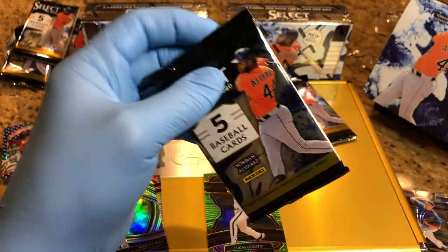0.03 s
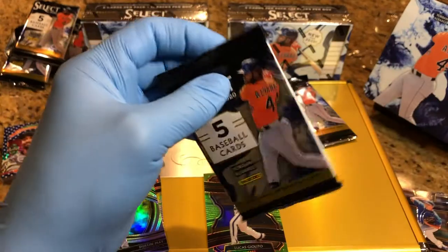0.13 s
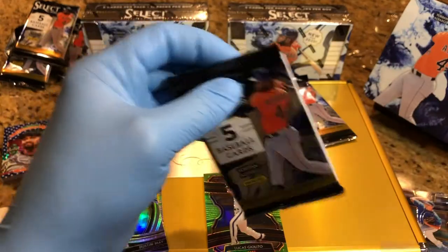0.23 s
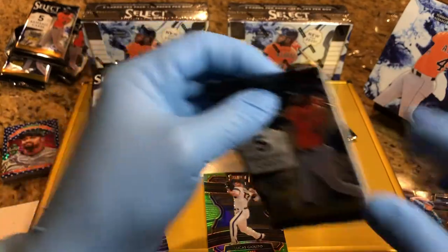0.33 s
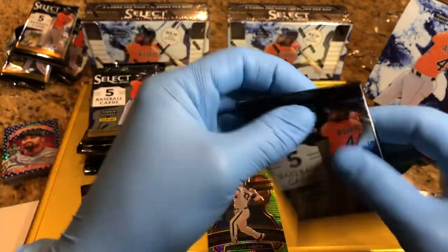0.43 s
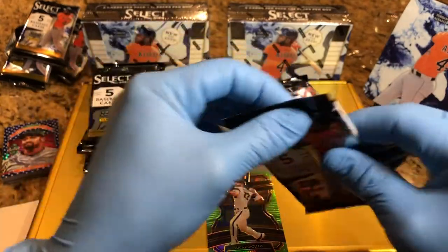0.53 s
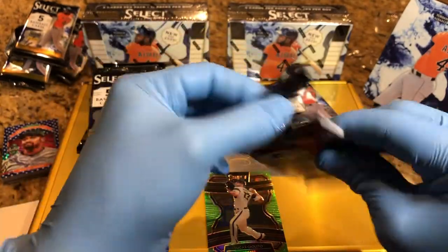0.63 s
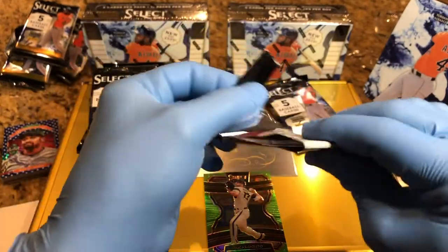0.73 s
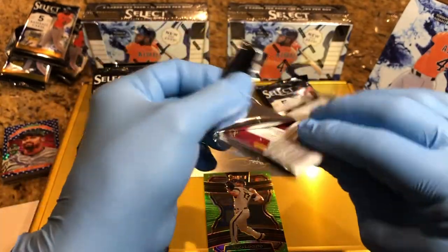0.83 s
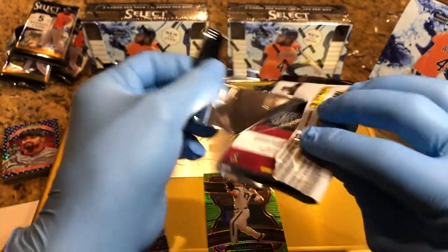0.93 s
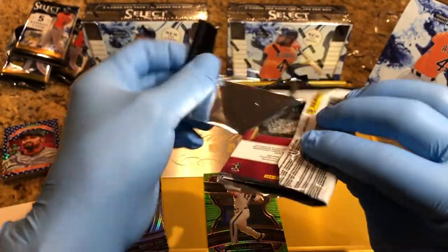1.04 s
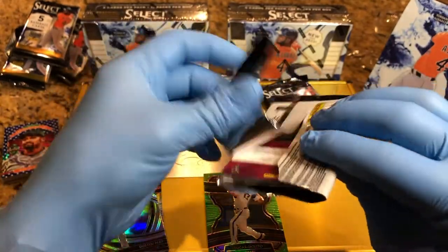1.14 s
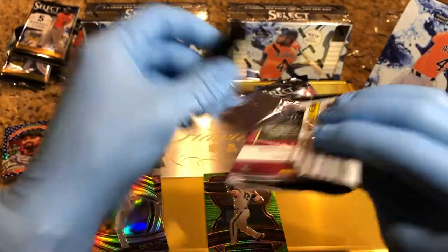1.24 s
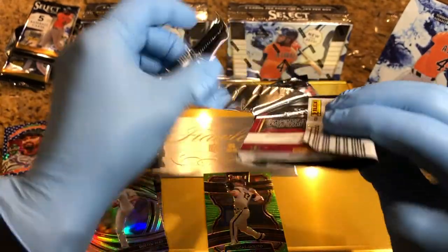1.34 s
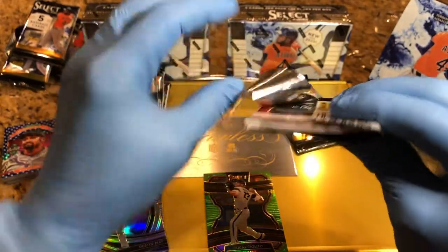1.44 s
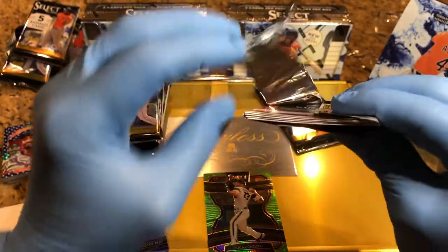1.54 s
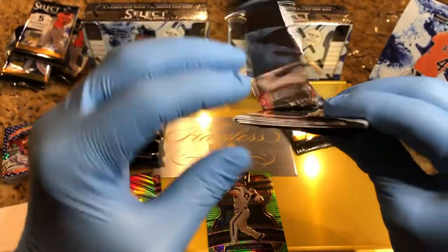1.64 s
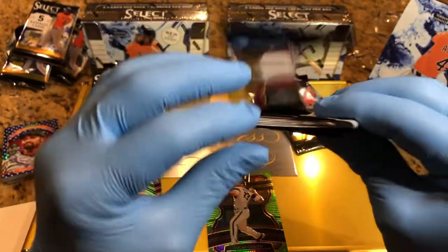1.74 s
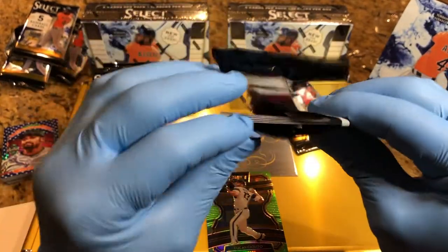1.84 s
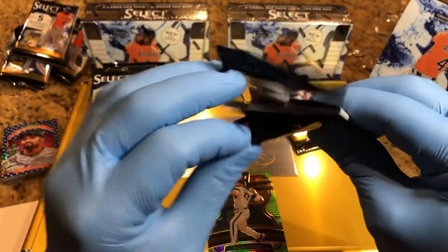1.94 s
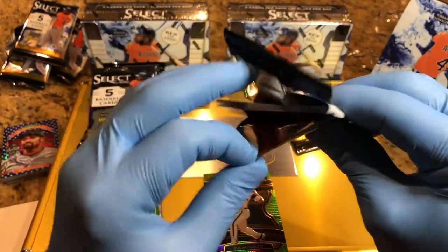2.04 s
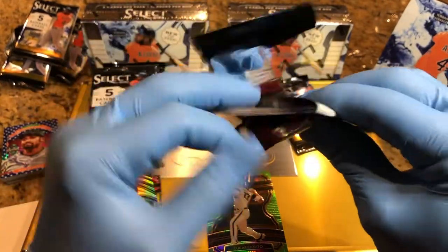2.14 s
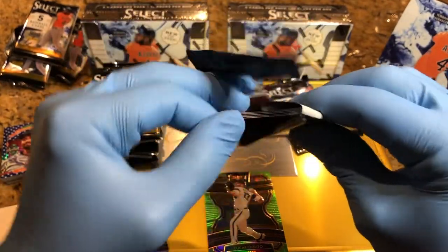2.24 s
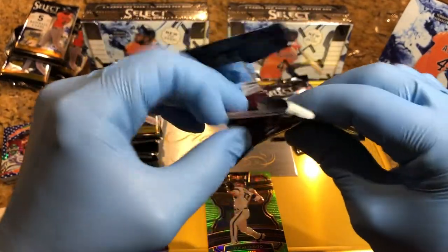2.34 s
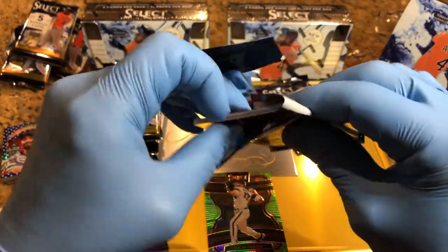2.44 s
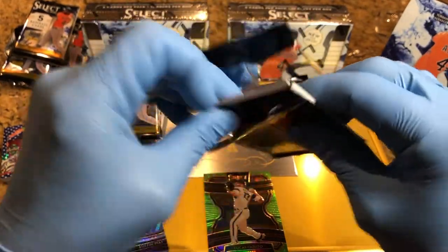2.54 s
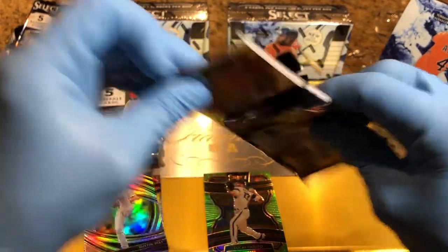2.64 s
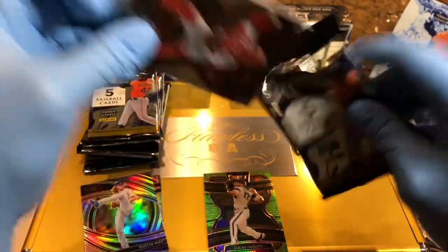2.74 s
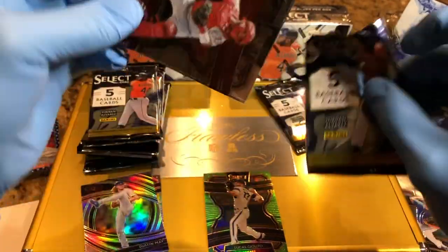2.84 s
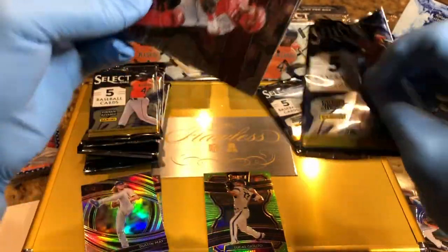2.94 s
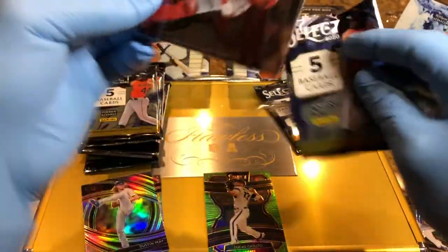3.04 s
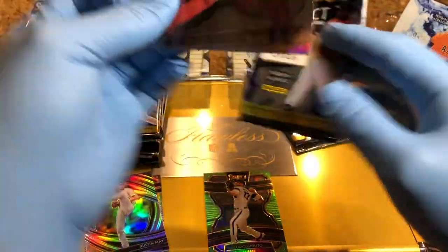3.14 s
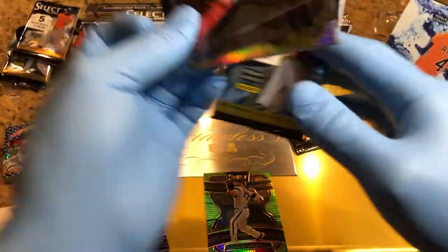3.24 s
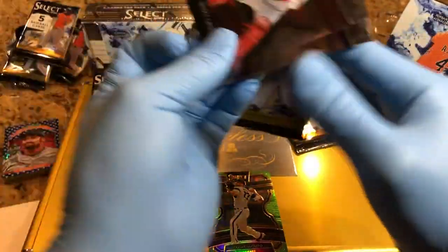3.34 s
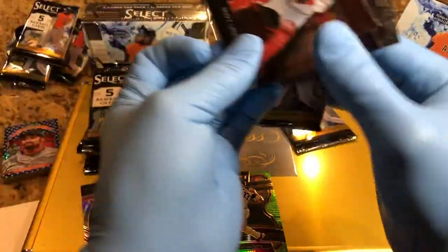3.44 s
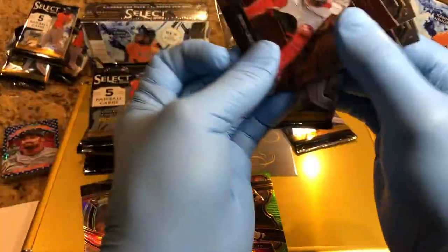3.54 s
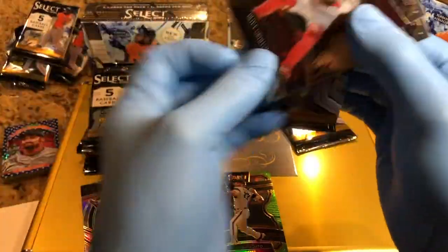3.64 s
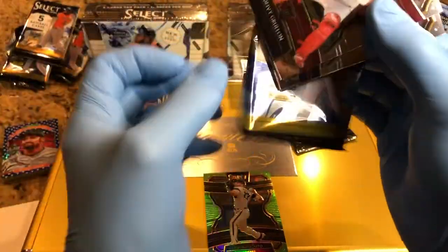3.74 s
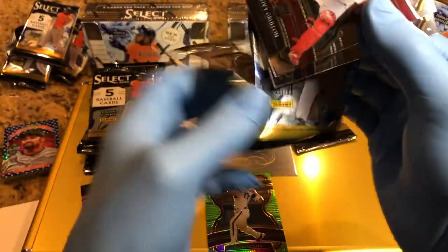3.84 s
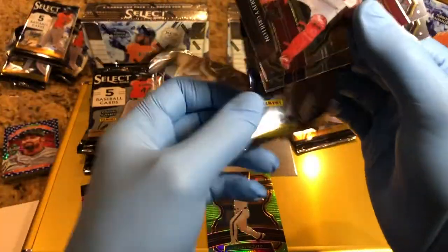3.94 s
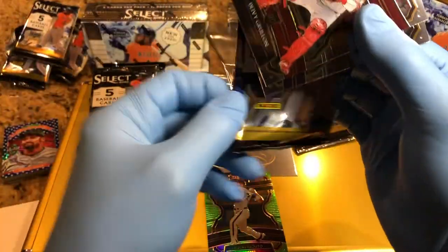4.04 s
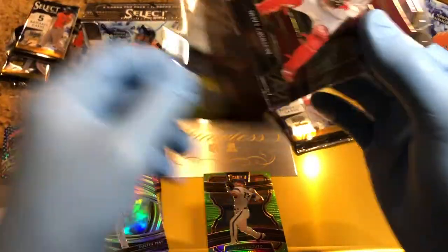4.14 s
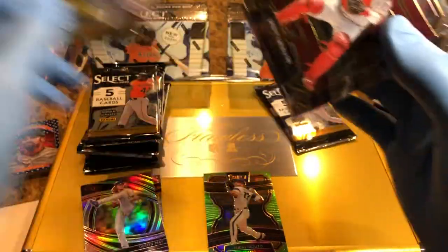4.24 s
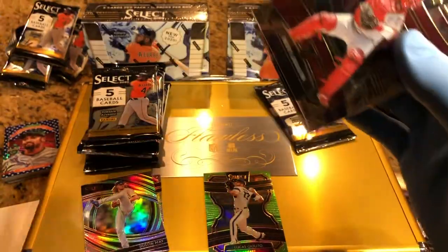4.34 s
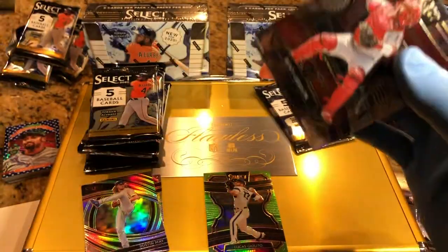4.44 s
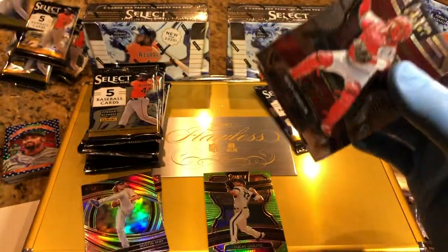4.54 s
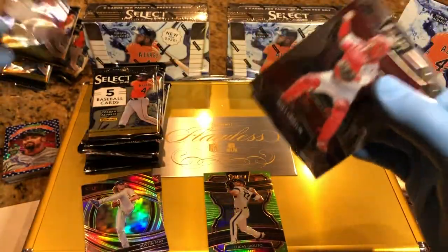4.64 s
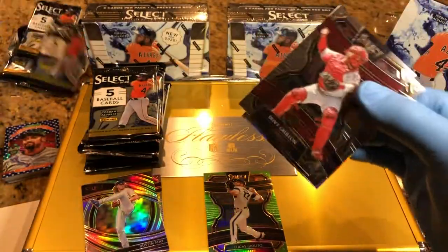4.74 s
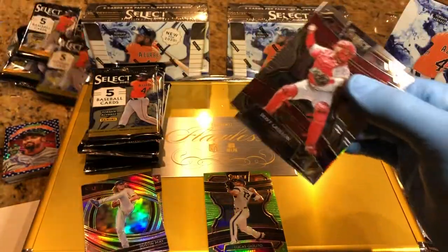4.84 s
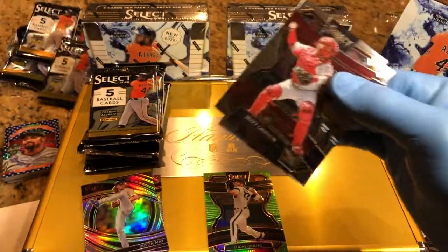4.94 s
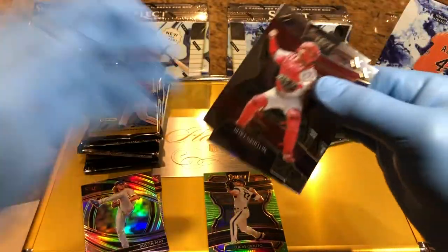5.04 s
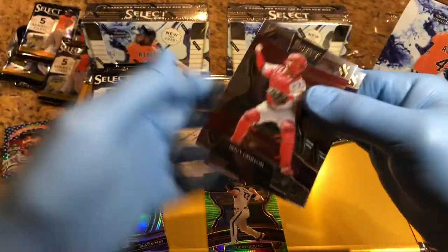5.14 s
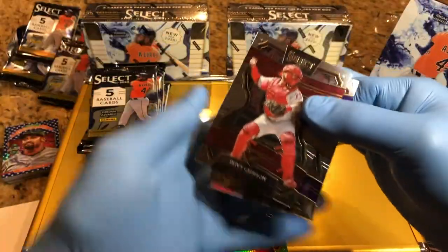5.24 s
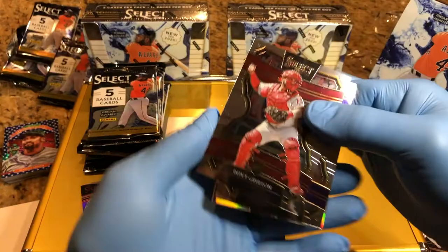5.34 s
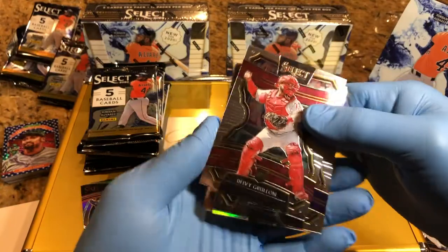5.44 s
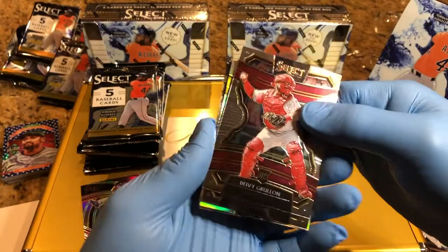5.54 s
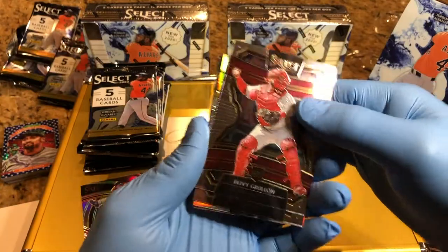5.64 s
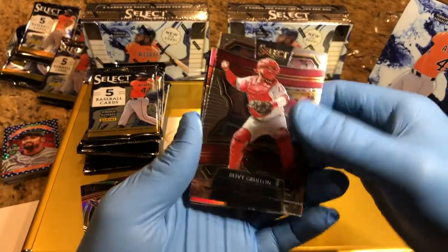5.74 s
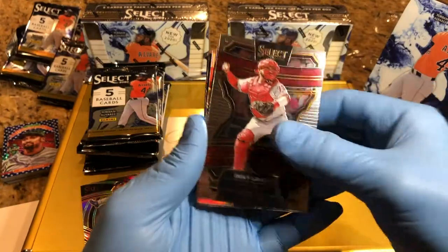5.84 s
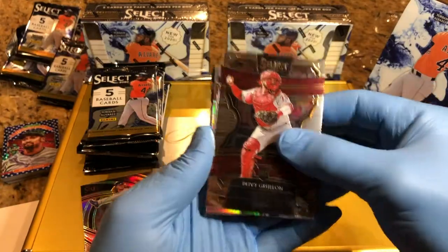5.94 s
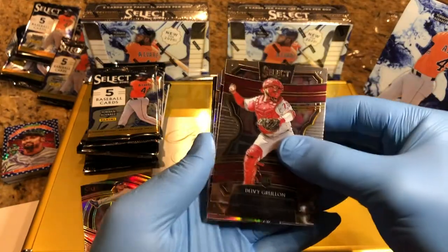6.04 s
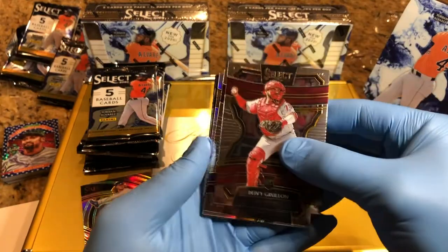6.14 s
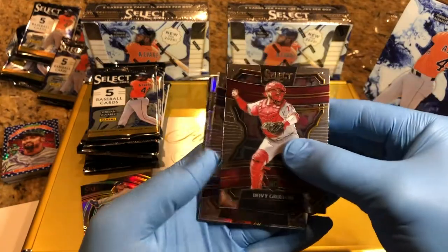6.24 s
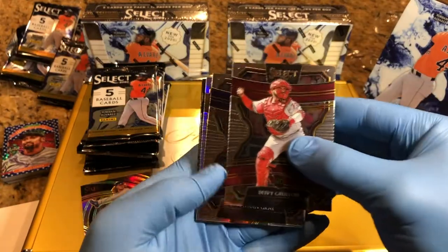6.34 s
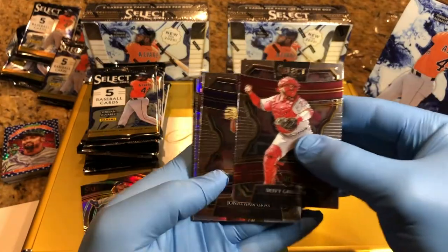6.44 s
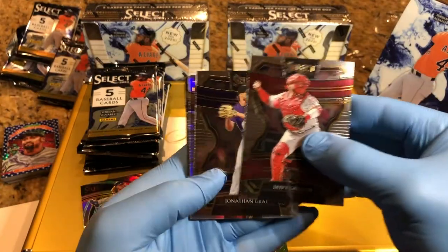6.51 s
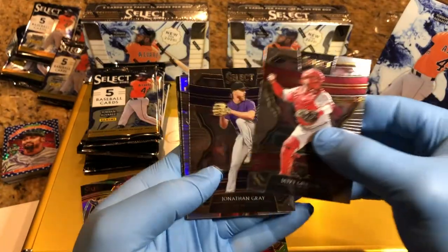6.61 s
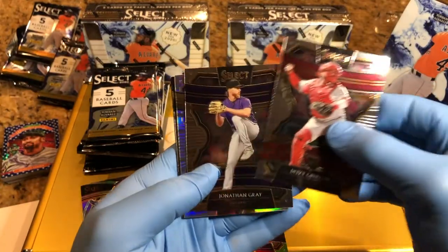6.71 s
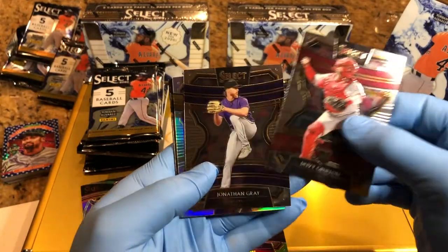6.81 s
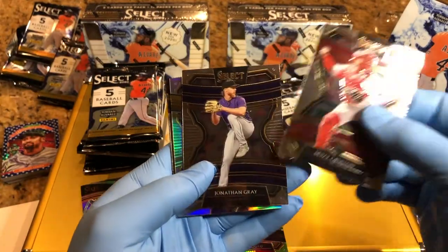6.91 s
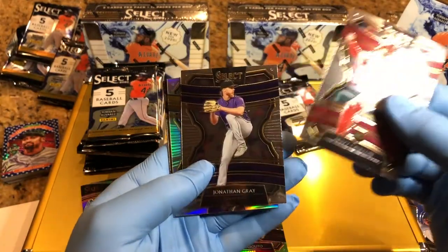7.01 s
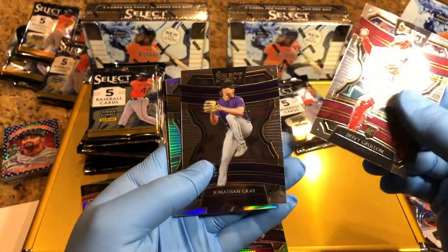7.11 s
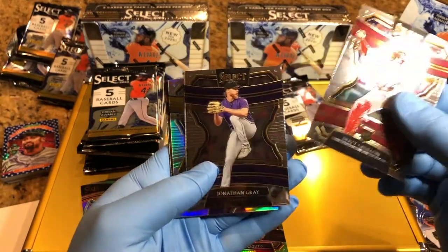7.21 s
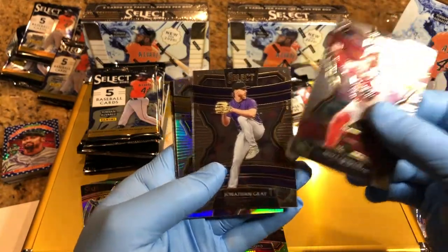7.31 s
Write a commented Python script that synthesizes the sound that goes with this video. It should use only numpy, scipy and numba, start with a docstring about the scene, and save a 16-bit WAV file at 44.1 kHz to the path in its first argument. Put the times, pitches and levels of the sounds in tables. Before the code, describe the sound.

A thin foil wrapper is handled loudly at first, with dense rustle, crisp snaps and a soft knock. Two short creaking peels follow, then a lull and renewed crinkling with several muffled table bumps around the middle. Afterwards only light friction and small clicks of cards remain. Indoor, close, slightly reflective, with low room drone beneath.

```python
"""Gloved hands tear open a foil pack of cards close to a phone, while a small room hums behind throughout.
At first the foil rustles and snaps thickly; small knocks on the table come in between.
The seam creaks twice as it peels, near 0.9 s and 1.3 s. The wrapper is then crumpled in uneven bursts, loud
again near 2.3 and 4 s, softer after; from about 5 s the cards are fanned with faint slides.
Rustle, snaps and slides are shaped noise; the creaks are rows of clicks that ring the flap, and the knocks are
noise pushed into a low resonance."""
import sys
import numpy as np
from scipy import signal
from scipy.fft import rfft, irfft
from scipy.io import wavfile
from scipy.ndimage import uniform_filter1d
from numba import njit

SR = 44100
rng = np.random.default_rng(int(sys.argv[2]) if len(sys.argv) > 2 else 0)


def digitize_waveform(pressure):
    """Quantize a signal to 16-bit integers and store it at the path in sys.argv[1].

    Rows of a 2-D input are taken as channels; values are limited to [-1, 1].
    """
    field = np.atleast_2d(pressure).T
    bounded = np.clip(field, -1, 1)
    quanta = np.round(bounded * 32767).astype(np.int16)
    wavfile.write(sys.argv[1], SR, quanta)


N = 325012  # samples in the scene, about 7.4 s


def undb(db):
    """Turn decibels into a plain amplitude factor."""
    return 10 ** (np.asarray(db) / 20)


def level(x, db):
    """Scale a sound so that its average (RMS) level is db."""
    return x * undb(db) / np.sqrt(np.mean(x ** 2))


@njit
def svf(x, hz, width):
    """State-variable band-pass with a moving centre, gain 1 there."""
    y = np.empty(len(x))
    band_state, low_state = 0., 0.
    for i in range(len(x)):
        g = np.tan(np.pi * hz[i] / SR)
        damping = width[i] / hz[i]
        v = (band_state + g * (x[i] - low_state)) / (1 + g * (g + damping))
        band_state = 2 * v - band_state
        low_state += 2 * g * v
        y[i] = damping * v
    return y


def band(x, hz, width):
    """Band-pass with fixed or moving centre and width in Hz."""
    one = np.ones(len(x))
    return svf(x, hz * one, width * one)


def band_twice(x, hz, width):
    """The same band-pass twice in a row, for steeper sides."""
    return band(band(x, hz, width), hz, width)


def curve(table):
    """Draw straight lines between the rows of a table: one value per sample for each column after time."""
    s, *columns = np.transpose(table)
    return [np.interp(np.arange(N) / SR, s, c) for c in columns]


def walk(rate):
    """Random levels, a new one every 1 / rate seconds, joined by slopes; spread near 1."""
    k = int(SR / rate)
    steps = np.repeat(rng.standard_normal(N // k + 1), k)
    return uniform_filter1d(steps, k)[:N]


def parts(crackle, mid_hz):
    """Filter three rows of crackle into a low, a middle and a high part."""
    low = band_twice(crackle[0], 1250, 2400)
    mid = band_twice(crackle[1], mid_hz, 1.7 * mid_hz)
    high = band_twice(crackle[2], 10500, 26000)
    return low, mid, high


def air():
    """Steady room noise, with ventilation droning in a few low room modes and faint, almost pure tones."""
    # noise colour of the room: (frequency [Hz], relative level per Hz [dB])
    air_colour = [(15, -53.5), (25, -16.5), (48, -8), (153, -6), (236, -2.5), (270, -4.5), (301, -0.5),
                  (335, -5), (373, -3.5), (516, -14), (560, -13), (1230, -22), (1560, -30.5), (3430, -34.5),
                  (16000, -50.5)]
    # ventilation drones in room modes: (frequency [Hz], width [Hz], level [dB])
    drones = [(59.6, 6.4, -76), (181.3, 25, -78.5), (299, 41, -70.5)]
    # faint steady tones: (frequency [Hz], level [dB])
    whines = [(1184, -87.5), (1243, -86), (9600, -104), (10750, -103)]
    air_db = -62
    hz = np.maximum(np.arange(N // 2 + 1) * SR / N, 1)
    colour_hz, colour_db = np.array(air_colour).T
    colour = undb(np.interp(np.log(hz), np.log(colour_hz), colour_db))
    out = level(irfft(rfft(rng.standard_normal(N)) * colour, N), air_db)
    for f, width, db in drones:
        out = out + level(band_twice(rng.standard_normal(N), f, width), db)
    for f, db in whines:
        out = out + level(band(rng.standard_normal(N), f, 2.1), db)  # noise only about 2 Hz wide
    return out


def handling():
    """Low, middle and high level in dB: the steady touch plus every squeeze, which swells and dies away."""
    # gloves shifting all along, busiest on the wrapper: (time [s], level [dB])
    touch = [(0, -71), (.28, -59.5), (.41, -68), (.8, -61.5), (1.0, -69.5), (1.47, -71), (1.66, -83),
             (1.9, -82.5), (2.2, -77.5), (2.8, -77.5), (3.2, -74.5), (3.4, -82), (3.7, -74), (4.5, -80.5),
             (5.14, -81), (5.5, -80.5), (6.38, -85), (7.37, -88)]
    # squeezes of foil and cards; rise and fall each span 20 dB:
    # (peak time [s], level [dB], rise [s], fall [s], low part [dB], high part [dB]), parts against the level
    grips = [(.068, -61.5, .15, .05, -3, -4), (.116, -43, 0.0058, .13, -21, -18),
             (.255, -47.5, .035, .03, -28, -16.5), (.435, -54.5, 0.0297, 0.062, -2, -8),
             (.505, -56, .06, .13, -14, -0.5), (.617, -56.5, 0.013, .1, -2, 4),
             (0.65, -46.5, .08, .08, -4, -9), (.758, -56.5, .1, 0.19, -12, 0),
             (.862, -52.5, 0.1496, 0.22, -3, -0.5), (1.083, -65, .25, 0.069, -1, -4),
             (1.147, -60.5, .05, .06, -4, -14.5), (1.26, -51, 0.05, 0.029, 4, -3),
             (1.371, -55.5, 0.07, .055, -10, -4), (1.802, -65, .04, .05, 0.5, -4),
             (1.974, -68.5, 0.09, 0.25, 4.5, 1.5), (2.116, -60, .11, .08, -8, -1),
             (2.233, -65, .07, 0.082, -5, -6.5), (2.313, -48, 0.034, .035, -22, -3),
             (2.407, -60, .16, 0.29, -8, -3.5), (2.528, -63.5, 0.198, 0.44, -12, 1.5),
             (2.665, -54.5, .14, 0.16, -5.5, 4), (2.733, -59.5, 0.17, 0.04, 6, -7),
             (2.936, -57.5, .06, 0.34, -23, -9), (3.011, -55.5, 0.067, .036, -1, 1),
             (3.123, -56, 0.042, .04, -15, -34), (3.279, -68, 0.097, 0.154, 1.5, -21),
             (3.54, -64.5, .05, 0.69, 5, -10.5), (3.65, -54, 0.043, 0.036, -9, -1.5),
             (3.749, -58.5, 0.02, .07, 2, -9.5), (3.849, -58.5, 0.033, .11, -6, -8),
             (3.985, -51, 0.051, 0.12, -1.5, -4), (4.057, -52, 0.018, .22, 1, -10),
             (4.302, -71, .13, 0.24, -1.5, -3.5), (4.602, -73.5, .13, .4, -7, -8),
             (4.699, -61.5, .05, .23, -0.5, -13), (5.498, -78, .1, .1, -2, 0),
             (5.641, -71, .06, .2, -8, -17), (5.843, -76, .2, .5, -7, -4.5), (6.124, -71, .17, .07, -3, -7)]
    # how fast the low, middle and high parts fall [times]: the treble of a squeeze dies first
    fade_speed = np.array([
        [1],
        [1.0],
        [2.3],
    ])
    touch_low_db, touch_high_db = -2, -3
    longest_hold_s = 0.01166  # a squeeze stays at its peak at most this long on either side
    t = np.arange(N) / SR
    # doubled decibels give power instead of amplitude, so that levels can be added
    power = undb(2 * (curve(touch)[0] + np.array([[touch_low_db], [0], [touch_high_db]])))
    for s, db, rise, fall, low_db, high_db in grips:
        hold = min(longest_hold_s, rise / 4, fall / 4)
        near = slice(max(int((s - 2 * rise) * SR), 0), int((s + 2 * fall) * SR))
        before = (s - hold - t[near]) / rise
        after = (t[near] - s - hold) / fall * fade_speed
        swell_db = db - 20 * np.maximum(np.maximum(before, after), 0)
        power[:, near] += undb(2 * (swell_db + np.array([[low_db], [0], [high_db]])))
    return 10 * np.log10(power)


def rustle(low_db, db, high_db):
    """Thousands of small cracks of uneven size over the hiss of gloves; wide folds crack low and on their own."""
    cracks_per_s = np.array([[250], [600]])  # wide folds, then small ones
    chance, size = rng.random((2, 2, N))
    cracks = (chance < cracks_per_s / SR) * undb(np.minimum(-9 * np.log(1 - size), 22))
    # every crack is a puff of noise that fades in about a millisecond
    power = signal.lfilter([1], [1, -np.exp(-1 / (0.00088 * SR))], cracks)
    # a firm grip crackles, a light touch mostly hisses
    share = np.array([[.8], [.45]]) * np.clip((db + 90.5) / 22, .05, 1)
    mix = share * power / power.mean(axis=1, keepdims=True) + 1 - share
    shape = np.sqrt(mix) * undb(2.5 * walk(90))
    # middle and high share the cracks of the small folds
    low, mid, high = parts(shape[[0, 1, 1]] * rng.standard_normal((3, N)), 4900)
    return level(low, 0) * undb(low_db) + level(mid, 0) * undb(db) + level(high, 0) * undb(high_db)


def ticks(db):
    """Snap rows for the small creases that go off by chance, each dull or bright in its own way."""
    ticks_per_s = 16
    over_db, spread_db = -5, 2.5  # least level against the rustle of the moment, and mean extra
    colour_db, tick_ms = 22, 0.91  # range from dull to bright; length, scaled by 0.3 to 1.3 below
    s, size, colour, length = rng.random((ticks_per_s * N // SR, 4)).T
    s = .02 + 7.2 * s
    tick_db = db[(s * SR).astype(int)] + over_db - spread_db * np.log(1 - size)
    low_db = 3.5 - colour_db * colour
    high_db = colour_db * colour - 15.5
    return list(zip(s, tick_db, low_db, high_db, tick_ms * (.3 + length)))


def snaps(table):
    """Each snap swells in very briefly, then bursts into noise that dies within milliseconds."""
    snap_hz, octaves_per_low_db = 5000, 0.0017  # the low part shifts the middle pitch very slightly
    out = np.zeros(N + 2048)
    t = (np.arange(2048) - 512) / SR  # the burst starts at t = 0
    first = (t >= 0) & (t < .005)
    for s, db, low_db, high_db, ms in table:
        hz = min(snap_hz * 2 ** (octaves_per_low_db * low_db), 6100)
        fade_in = undb(-9) * np.exp(np.minimum(t, 0) * 1000 / max(0.25 * ms, .15))
        body = np.exp(-np.abs(t * 1000 / max(1.1 * ms, .15)) ** 1.5)
        click = 0.71 / max(ms, .3) * np.exp(-t / .00012)  # a sharp edge at the start of the burst
        shape = np.where(t < 0, fade_in, body + click)
        rows = parts(shape * rng.standard_normal((3, 2048)), hz)
        start = int(s * SR) - 512
        for x, part_db in zip(rows, (low_db, 0, high_db)):
            # levels hold for the first five milliseconds
            out[start:start + 2048] += undb(db + part_db) * x / np.std(x[first])
    return out[:N]


def slides():
    """Soft swells of friction noise in the narrow gap between two cards."""
    # brief whistling slides; the length spans the points about 20 dB below the peak:
    # (time of peak [s], level [dB], centre [Hz], width [Hz], length [s])
    slide_table = [(5.04, -69.5, 7100, 2500, 0.052), (5.639, -74.5, 5380, 2490, 0.057),
                   (5.705, -72.5, 3360, 405, 0.081), (5.842, -72, 4000, 1500, 0.026),
                   (5.948, -76, 2310, 1200, 0.3), (6.276, -70.5, 7970, 1470, .05),
                   (.07, -52, 3130, 500, 0.026)]
    out = np.zeros(N)
    t = np.arange(8820) / SR - .1
    for s, db, hz, width, length in slide_table:
        rub = band_twice(rng.standard_normal(len(t)), hz, width)
        swell = level(rub, db) * np.exp(-(3 * t / length) ** 2)
        begin = int((s - .1) * SR)
        start = max(begin, 0)  # drop what would lie before the scene
        out[start:begin + len(t)] += swell[start - begin:]
    return out


def bumps():
    """Soft dull knocks: a noisy push into a damped low resonance."""
    # pack and hands bump the table: (time [s], peak level [dB], pitch [Hz], 60 dB decay of the push [s])
    bump_table = [(.652, -48.5, 295.3, 0.05), (3.065, -41.5, 300, 0.027), (3.536, -48, 300, 0.041),
                  (3.748, -37.5, 279, 0.048), (3.973, -42, 451, 0.025), (4.059, -40, 185.6, 0.063),
                  (4.094, -46, 350, 0.059)]
    out, t = np.zeros(N), np.arange(4096) / SR
    for s, db, hz, t60 in bump_table:
        push = rng.standard_normal(4096) * np.exp(-t * np.log(1000) / t60)
        knock = band_twice(push, hz, 1.2 * hz)
        start = int(s * SR)
        out[start:start + 4096] += undb(db) * knock / np.abs(knock).max()
    return out


def peel(table):
    """The seam sticks and slips unevenly; every slip rings the loosening flap, whose pitch glides."""
    rate_hz, flap_hz, db = curve(table)
    phase = np.cumsum(rate_hz * (1 + 0.073 * walk(200)) / SR)
    # one click at each whole turn of the phase, each of its own strength
    slips = np.diff(np.floor(phase), prepend=0) * undb(2.7 * walk(300))
    flap = band(band(slips, flap_hz, 0.59 * flap_hz), flap_hz, .7 * flap_hz)
    ring = flap + 0.1 * band(slips, 860, 299.4)
    t = np.arange(N) / SR
    return level(ring, 0) * undb(db) * (t > table[0][0]) * (t < table[-1][0])


def room(x):
    """Close reflections off table and boxes, then a weak tail from the walls that loses its treble first."""
    t = np.arange(SR // 2) / SR
    echo = 0
    # centre [Hz], width [Hz], 60 dB decay [s], level [dB], delay [s]
    near = (6160, 20000, 0.01, -16.5, 0.0015)
    walls = (2500, 11000, 0.5, -22, .006)
    walls_treble = (9000, 15000, 0.29, -28, .006)
    for hz, width, t60, db, late in (near, walls, walls_treble):
        tail = band(rng.standard_normal(len(t)), hz, width) * np.exp(-t * np.log(1000) / t60) * (t > late)
        echo = echo + undb(db) * tail / np.linalg.norm(tail)
    return x + signal.fftconvolve(x, echo)[:N]


def scene():
    """Add up all that the hands do, let it echo in the room, and lay the room noise under it."""
    # creases and card edges that stand out; parts are against the level:
    # (time [s], level [dB], low part [dB], high part [dB], nominal length [ms])
    crease_table = [(.1044, -29, -22.5, -10, 4.3), (.1146, -25, -24.5, -6, 3.6), (.149, -44.5, -16, -7, 3),
                    (.1633, -39, -13.5, -15, 5), (0.1904, -37.5, -14, -20, 9.7),
                    (.213, -35, -15.5, -18, 1.5), (0.2463, -45.5, -17, -19, 4),
                    (0.256, -42.5, -13.5, -22, 6.2), (.2852, -48, -6.5, -14, 5), (.2961, -50, -15, -13, 3),
                    (.3276, -39.5, -1, -1, 0.19), (.436, -43.5, -13, 8.5, 3.1),
                    (0.4424, -40.5, -6, -2, 3.1), (.4597, -48, -3, -8, 2.4), (.4963, -44, -6.5, -23, 7.2),
                    (0.5062, -39, -9, 1, 2), (.5753, -48.5, -12.5, -6, 1.1), (0.6045, -45, 1, -2, 2.9),
                    (0.6148, -41, -1, 3.5, 8.9), (.626, -48.5, -10.5, -3, 3), (0.634, -36, -28, -8, 2.1),
                    (0.6438, -38.5, -3, 4, 4.4), (.6495, -34, -20.5, 1.5, 3.9), (.6622, -41, -26, 6.5, 1.8),
                    (.6776, -43.5, -14, -4, 1.5), (0.6972, -39, -7.5, -16, 6.3),
                    (0.7058, -29.5, -13, -1.5, 0.4), (.7313, -45.5, -21, -4, 1.2),
                    (0.7496, -48.5, 3.5, 3, 2.6), (0.7545, -31, -20, 2, 1.1), (.8093, -54, -9, 0, 6.1),
                    (.8418, -54, -12, -5, 3.2), (.8487, -33.5, -29, -30, .61), (0.8556, -33, -35, -9, 0.89),
                    (0.8735, -40.5, -7, -5, 4.3), (.903, -41.5, -1, -4, 2.7), (.954, -53, -11.5, 3, 1.2),
                    (.9639, -54.5, -27.5, 3, 1.2), (.9839, -57.5, -13, 3, 2.2), (.9932, -60, 6, 1, 1.5),
                    (1.028, -56.5, -5, 1, 3), (1.047, -67, -12, 14, 2.5), (1.0683, -46.5, -12.5, -10, 1.6),
                    (1.078, -43, -16, -24, 4.4), (1.093, -45, -18, 1, 0.64), (1.141, -39, -16, -25, 5.9),
                    (1.1593, -51.5, -6.5, -10, 1.9), (1.2364, -32.5, -13.5, 3.5, 0.5),
                    (1.308, -63, -15, 7, 1.3), (1.3389, -47, -7.5, -23, 4.2),
                    (1.3577, -53.5, -20, 10, 0.72), (1.387, -48, -10, -22, 2.1),
                    (1.42, -50.5, -7, -21, 1.5), (1.451, -53, -4.5, -25, 3.5), (1.7593, -61.5, 5, 4.5, 5.3),
                    (1.7986, -49, -15, -2, 1.1), (1.8619, -52.5, 3, -13, 4), (1.9114, -50.5, -1.5, -9, 1.8),
                    (1.927, -58.5, 3.5, -10, 1.1), (1.9389, -42.5, -6, -8, 1.8),
                    (1.9662, -32, -13, -8, 2.3), (2.0422, -64.5, 8.5, 11, 1.4), (2.087, -54, -20, 2, 3),
                    (2.117, -51, -23.5, 6.5, 5.3), (2.142, -54, -28, -16, 1.8),
                    (2.157, -47.5, -2.5, -28, 0.48), (2.1688, -56.5, 3.5, -9, 2.7),
                    (2.227, -53.5, -27, -4, 2.9), (2.322, -43.5, -20, -4, 2.9),
                    (2.36, -55.5, 1.5, -20, 3.1), (2.397, -46, -14, -11, 3.7), (2.4019, -28.5, -18, -18, 1),
                    (2.4396, -53.5, -18, 0, 3.1), (2.458, -60, -17, 4, 2.8), (2.4675, -56, -19, 5, 2),
                    (2.5233, -49, -29, 7.5, 2.7), (2.5352, -38.5, -26, -23, 2.5), (2.64, -50, -16, -7, 2.7),
                    (2.652, -45, -3.5, -19, 2.5), (2.673, -51, 0, -6, 2.5), (2.666, -54, 4, -10, 3.7),
                    (2.7, -59.5, 7, -15, 4), (2.7198, -44.5, -3, 1, 0.68), (2.7315, -55.5, 5.5, 8, 0.99),
                    (2.742, -54, 3, -12, 4.8), (2.752, -65, 6, -18, 1.8), (2.859, -39.5, -40, -5, 0.68),
                    (2.9418, -47.5, -9, -9, 2.7), (2.9656, -41, -4.5, -11, 2.4),
                    (3.0154, -30.5, -25, -33, 0.76), (3.0645, -35.5, -9.5, -30, 3),
                    (3.069, -42.5, 0, -23, 4.1), (3.1289, -53, -12, -5, 0.93), (3.1825, -65.5, 6, -33, 3.4),
                    (3.271, -52, -18, -32, 3.6), (3.3762, -70.5, 12, -20, 4.5),
                    (3.4427, -68, 9.5, -15, 3.3), (3.4873, -69, 12, -2, 4.2), (3.53, -54, 9, -14, 3.7),
                    (3.538, -39.5, -1, -7, 4.2), (3.688, -53, -8.5, -17, 1.4), (3.7421, -54, 11, -13, 5.8),
                    (3.7481, -46, 4, -26, 3.3), (3.8585, -52, 2, -12, 1.9), (3.896, -53.5, -3, -16, 5),
                    (3.9577, -54, 4.5, -13, 2.9), (3.976, -39.5, -14.5, 6, 1.4),
                    (3.996, -46, -17.5, -2, 2.2), (4.0078, -46, -4, -2, 6.5), (4.046, -47.5, -6, 8, 3.6),
                    (4.0531, -41.5, 2.5, -24, 7.5), (4.0576, -33.5, -7.5, 3.5, 1.1),
                    (4.0942, -46.5, -18, -23, 1.4), (4.1372, -53, -9, -22, 2.6),
                    (4.2887, -37, -8.5, -7, 0.41), (4.49, -61.5, -5, -25, 1.3), (4.5321, -65, -16, -5, 1.2),
                    (4.5882, -65, -5, -11, 2.2), (4.61, -56, -9, -2, 1.8), (4.6854, -61, 6, -3, 8),
                    (4.6962, -54.5, 5, 0, 1.3), (4.7274, -61.5, 10, -3, 1.3), (4.8901, -66, 5.5, -21, 2.1),
                    (5.318, -57, -6, -25, 5.5), (5.452, -81, -8, 10, 1.5), (5.8769, -73, 1, -2, 1.8),
                    (5.971, -71.5, 4, 4, 2.2), (6.122, -61.5, -0.5, -6, 6), (6.269, -68, -14.5, 1.5, 2.1),
                    (6.7465, -71.5, 1.5, -18.5, 2.7), (6.9284, -70.5, 2.5, -15, 2)]
    # two peels of the seam by stick-slip, each with rows:
    # (time [s], slips per second [Hz], flap resonance [Hz], level [dB])
    peel_tables = [
        [(.8, 215, 760, -74), (.835, 216.8, 690, -54), (.86, 210.8, 660, -51), (.89, 206.1, 512, -49),
         (.925, 198, 456, -49), (.95, 150, 360, -53), (.975, 125, 290, -55), (1.0, 117, 260, -61)],
        [(1.244, 327, 382, -62), (1.255, 334, 415, -43), (1.275, 318, 486, -44), (1.288, 303, 560, -52.5),
         (1.3, 305, 560, -61)],
    ]
    low_db, db, high_db = handling()
    hands = rustle(low_db, db, high_db)
    hands = hands + snaps(crease_table + ticks(db))
    hands = hands + slides() + bumps()
    for table in peel_tables:
        hands = hands + peel(table)
    return (room(hands) + air())[None, :]


def record(dry):
    """The phone rolls off the deepest bass and cuts the top."""
    bass_hz, top_hz = 36, 16300
    thin = signal.sosfilt(signal.butter(2, bass_hz, "high", fs=SR, output="sos"), dry)
    return signal.sosfilt(signal.ellip(10, .2, 70, top_hz, fs=SR, output="sos"), thin)


dry = scene()
out = record(dry)
digitize_waveform(out)
```